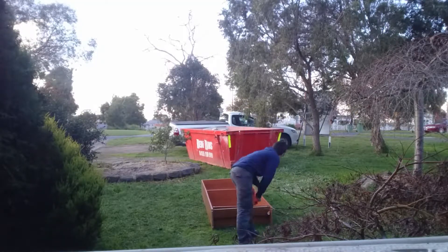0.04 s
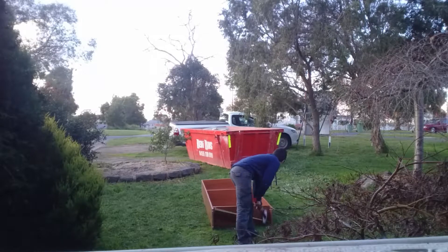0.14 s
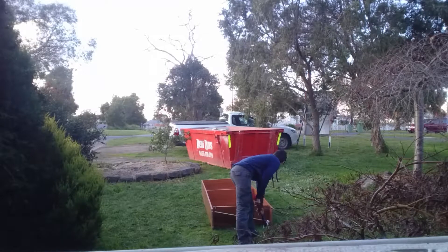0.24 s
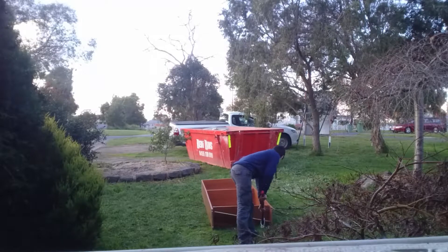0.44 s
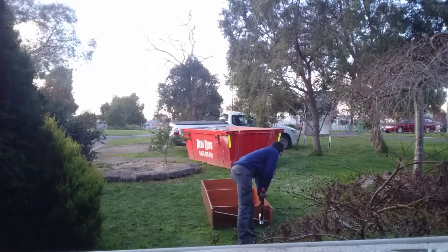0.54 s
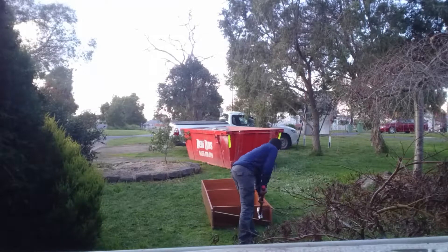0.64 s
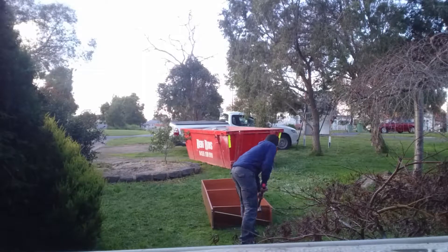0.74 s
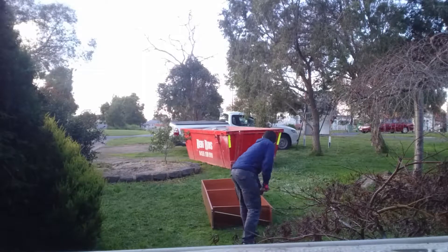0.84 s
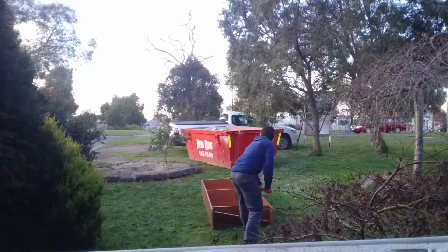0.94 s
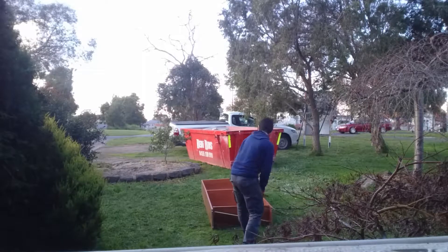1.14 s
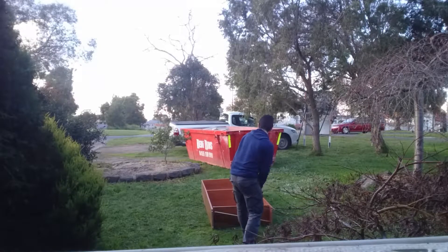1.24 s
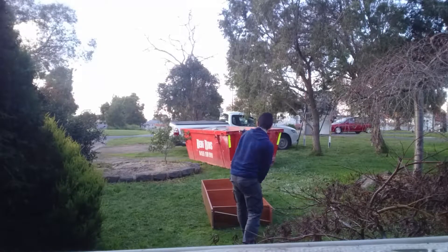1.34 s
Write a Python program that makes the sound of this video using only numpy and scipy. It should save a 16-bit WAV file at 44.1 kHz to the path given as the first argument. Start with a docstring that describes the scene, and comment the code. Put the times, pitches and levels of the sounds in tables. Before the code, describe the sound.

One loud, hollow bang of a wooden bookshelf falling on grass, then faint ticks.

```python
"""On a lawn, a stereo microphone a few metres from a wooden bookshelf. A distant road hums, a far car
passes and a little wind rises. At 0.2 s the toppling shelf lands on one edge; at 0.25 s the whole case
slams down and its boards knock. Each blow cracks and rings the panels, and house and trees scatter it
back. Around 0.5 s loose pieces tick as they settle; then a second far car swells and fades."""
import sys
import numpy as np
from scipy import signal
from scipy.fft import rfft, irfft, next_fast_len
from scipy.io import wavfile

SR = 44100
rng = np.random.default_rng(int(sys.argv[2]) if len(sys.argv) > 2 else 0)


def dump(signal):
    """Clip the signal to [-1, 1] and save it as 16-bit WAV at the path in sys.argv[1]."""
    limited = np.clip(np.atleast_2d(signal).T, -1, 1)
    pcm = np.round(limited * 32767).astype(np.int16)
    wavfile.write(sys.argv[1], SR, pcm)


N = 61739
BANDS_HZ = 25 * 2 ** (np.arange(29) / 3)  # third-octave centres


def undb(db):
    """Decibels to gain."""
    return 10 ** (np.asarray(db) / 20)


def pan(db):
    """Left and right gains for a level difference."""
    return undb(np.array([[db], [-db]]) / 2)


def at(hz, table, col=1):
    """Read a column of a table on a log-frequency axis."""
    table = np.array(table)
    return np.interp(np.log(np.maximum(hz, 1)), np.log(table[:, 0]), table[:, col])


def since(start):
    """Seconds since a moment, zero before it."""
    return np.maximum(np.arange(N) / SR - start, 0)


def ring(t, t60, rise):
    """Envelope that swells and then dies away."""
    return (1 - np.exp(-t / rise)) * np.exp(-np.log(1000) * t / t60)


def noise(spectrum, alike_hz):
    """Stereo noise of unit level; left and right are alike below alike_hz."""
    size = next_fast_len(N)
    f = np.arange(size // 2 + 1) * SR / size
    mid, side = rfft(rng.standard_normal((2, size)))
    alike = 1 / (1 + (f / alike_hz) ** 2)
    stereo = np.sqrt(1 + alike) * mid + np.sqrt(1 - alike) * side * np.array([[1], [-1]])
    y = irfft(spectrum(f) * stereo, size)[:, :N]
    return y / y.std()


def band(hz, alike_hz):
    """A third of an octave of stereo noise."""
    return noise(lambda f: np.exp(-(np.log2((f + 1) / hz) * 4) ** 2), alike_hz)


def hump(hz, width_hz, alike_hz):
    """Noise around one resonance."""
    return noise(lambda f: 1 / (1 + (2 * (f - hz) / width_hz) ** 2), alike_hz)


def add(out, start, sound):
    """Mix a sound in at a moment."""
    i = int(start * SR)
    count = min(sound.shape[-1], N - i)
    out[:, i:i + count] += sound[..., :count]


# spectrum of the distant road (f/Hz, relative level/dB)
ROAD_SPECTRUM = [(41, -48), (70, -16.5), (150, -11), (172, -21.5), (246, -4.5), (301, -19), (386, -14),
                 (578, -13.5), (632, -16), (3640, -27.5), (5100, -37.5), (15000, -47.5)]
# far cars (peak t/s, half-length/s, f/Hz, width/Hz, level/dB)
FAR_CARS = [(0.055, .15, 406.3, 110, -71), (1.035, .17, 630.8, 503.2, -77)]
# slow drift of the whole background (t/s, gain/dB)
BACKGROUND_DRIFT = [(0, 2), (.7, 0.5), (1.1, 0.5), (1.4, -2)]

def background():
    """Far behind the shelf, road noise with a low drone and passing cars; a soft gust to the right."""
    t, alike_hz = since(0), 700
    road = undb(-68) * noise(lambda f: undb(at(f, ROAD_SPECTRUM)), alike_hz)
    gust_db = 10 * np.exp(-((t - 0.35) / 0.25) ** 2)
    wind = undb(-65.5 + gust_db) * hump(hz=39.87, width_hz=21, alike_hz=45) * pan(-4.5)
    drone = undb(-68.5) * hump(hz=247, width_hz=36, alike_hz=alike_hz)
    cars = sum(undb(db) / np.hypot(1, (t - peak) / half_length) * hump(hz, width, alike_hz)
               for peak, half_length, hz, width, db in FAR_CARS)
    drift_db = np.interp(t, *np.array(BACKGROUND_DRIFT).T)
    return (road + wind + drone + cars) * undb(drift_db)


# blows on the boards (t/s, bass/dB, middle/dB, presence/dB, treble/dB, snap/dB, crack/dB,
# contact/ms, pan L-R/dB)
BOARD_BLOWS = [(0.2037, -5.5, -6, -1.5, 0.5, -3, -11, 0.18, -0.5),
               (0.21, -5.5, -7.5, -1, -7, -6.5, -17, .2, 6.5),
               (0.2275, -7.5, -10.5, -13, -0.5, 14.5, -16.5, 0.08, -7),
               (0.247, -5.5, -10.5, -6, -10, 0, -2.5, 0.16, 4.5), (0.2500, -2, -2, 1, 1.5, 1, 7.5, .33, 1),
               (0.2582, -3.5, -1.5, -5.5, -14.5, -2.5, 0.5, 0.14, 4.5),
               (0.2927, -17, -17.5, -10.5, -17.5, 11.5, -9.5, .2, 3.5),
               (0.2954, -17, -24, -13, -9, 17, -16.5, 0.051, 3),
               (0.3250, -1.5, -10, -16, -25, 11.5, -19.5, 0.27, -1)]
# centres of bass, middle, presence and treble (f/Hz)
ZONE_CENTRES = [330, 900, 2800, 7500]

def blows():
    """Each blow sends a pressure crack to the microphone; returns the cracks and the hits on the boards."""
    cracks, hits, t = np.zeros((2, N)), [], since(0)[:N // 8]
    for start, *zone_db, snap_db, crack_db, contact_ms, pan_db in BOARD_BLOWS:
        contact = t / (contact_ms / 1000) - 2
        pulse = -2 * contact * np.exp(-contact ** 2)  # slope of a bell-shaped push
        add(cracks, start, pulse * undb(crack_db - 12) * pan(pan_db))
        band_db = at(BANDS_HZ, list(zip(ZONE_CENTRES, zone_db)))
        hits.append((start, band_db, snap_db, pan_db))
    low_cut = signal.butter(2, 260, "high", fs=SR, output="sos")
    return signal.sosfilt(low_cut, cracks), hits


# dense modes of the boards (f/Hz, band level/dB, t60/s, pan L-R/dB)
BOARD_MODES = [(100, -52.5, 0.14, 2.5), (210.4, -40, .25, 9), (449.2, -37.5, 0.29, 5), (900, -34, 0.13, 5),
               (1730, -25.5, 0.11, 1), (2449, -26.5, 0.24, 4.5), (4200, -28.5, 0.17, 2.5),
               (7230, -36.5, 0.23, -2), (12360, -49, .12, -10), (15500, -73.5, .12, -2.5)]

def boards(hits):
    """Each hit snaps and rings off in the boards, whose modes lie so close that they sound as noise."""
    out, t = np.zeros((2, N)), since(0)[:N // 4]
    offsets = rng.integers(0, N - len(t), 64)  # each hit rings with its own stretch of noise
    snap = np.exp(-t / 0.00093)
    for k, hz in enumerate(BANDS_HZ):
        if hz < BOARD_MODES[0][0] * 2 / 3:
            continue
        modes = band(hz, alike_hz=900) * undb(at(hz, BOARD_MODES)) * pan(at(hz, BOARD_MODES, col=3))
        decay = ring(t, t60=at(hz, BOARD_MODES, col=2), rise=1 / hz)
        for (start, band_db, snap_db, pan_db), i in zip(hits, offsets):
            envelope = decay * (1 + undb(snap_db) * snap) * undb(band_db[k])
            add(out, start, modes[:, i:i + len(t)] * envelope * pan(pan_db))
    return out


# modes of the hollow case (f/Hz, level landing on edge/dB, level landing flat/dB, t60/s)
CASE_MODES = [(133.3, -41, -35.5, 0.26), (180.4, -31.5, -26.5, 0.26), (249.6, -18, -24.5, .25),
              (268.23, -15, -16.5, 0.21), (297.4, -26, -26, .26), (355.3, -25.5, -22, 0.2),
              (390.2, -17.5, -25, .19), (397, -11, -22.5, 0.21), (551, -19.5, -26.5, .22),
              (597, -14, -21.5, 0.11), (643, -24.5, -20.5, 0.095), (819.4, -14.5, -20.5, .15),
              (880, -25, -22, 0.16), (961, -36.5, -15, 0.08), (1072, -18, -30, 0.18),
              (1128, -28, -23, 0.23), (1241, -25, -24, 0.23), (1334, -28.5, -25, 0.24)]
# landings on the lawn, edge then flat (t/s, rise of the ring/s)
CASE_LANDINGS = [(0.2043, 0.016), (0.2504, 0.0041)]

def case_boom():
    """The hollow case booms twice, a little to the left; edge and flat side drive its modes differently."""
    out, right_lag_s = np.zeros((2, N)), 0.00019
    t = np.array([since(0), since(right_lag_s)])[:, :N // 2]
    for hz, *drive_db, t60 in CASE_MODES:
        for (start, rise), db in zip(CASE_LANDINGS, drive_db):
            add(out, start, undb(db) * ring(t, t60, rise) * np.sin(2 * np.pi * hz * t))
    return out * pan(3.5)


# far scatter from hedge and trees (f/Hz, level/dB, t60/s)
TREE_SCATTER = [(100, -10, 0.24), (295, -13, 0.33), (1238.4, -18, 0.39), (2200, -15.5, .44),
                (3300, -14.5, .44), (5200, -25, 0.51), (13000, -30, .22)]
# near reflections from the house front (f/Hz, level/dB)
HOUSE_FRONT = [(120, -5), (300, -13.5), (1000, -19), (4000, -19.5), (9000, -20), (13000, -15)]

def garden_echo(sound):
    """The house front returns a cluster of reflections around 70 ms, hedge and trees a longer tail."""
    response = 0
    cluster = np.exp(-((since(0) - 0.07) / 0.022) ** 2)
    for hz in BANDS_HZ[BANDS_HZ > TREE_SCATTER[0][0] * 2 / 3]:
        tail = ring(since(0.0093), t60=at(hz, TREE_SCATTER, col=2), rise=0.012)
        for envelope, table in (tail, TREE_SCATTER), (cluster, HOUSE_FRONT):
            echo = band(hz, alike_hz=600) * envelope
            echo *= np.sqrt(hz / SR / np.sum(echo ** 2))  # energy in proportion to bandwidth
            response = response + echo * undb(at(hz, table))
    return signal.fftconvolve(sound, response, axes=1)[:, :N]


# loose pieces (t/s, level/dB, centre f/Hz, loss an octave from the centre/dB, snap/dB, pan L-R/dB)
LOOSE_PIECES = [(0.4380, -36, 4167, 23, 20, 0), (0.4724, -32.5, 4200, 4.5, 10.5, 2),
                (0.4790, -34, 5000, -0.5, 12, 6), (0.5082, -28, 14000, 2.2, 9, 2),
                (0.512, -30, 13760, 7, 17, 0.5), (0.5200, -28.5, 290, 7, 12, 9),
                (0.5360, -41.5, 7000, 1, 0, 1)]

def settling_ticks():
    """Loose pieces tick as they settle; returns their light hits on the boards."""
    return [(start, db - abs(loss_db) * np.log2(BANDS_HZ / hz) ** 2, snap_db, pan_db)
            for start, db, hz, loss_db, snap_db, pan_db in LOOSE_PIECES]


def scene():
    """At the microphone: the shelf a few metres off, the garden around it, the road far behind."""
    cracks, hits = blows()
    knocks = cracks + boards(hits + settling_ticks())
    boom = case_boom()
    return boom + knocks + garden_echo(knocks + undb(-3.5) * boom) + background()


def record(dry):
    """The microphone rolls off the top octave and the recorder cuts steeply above 15.5 kHz."""
    microphone = signal.butter(4, 13800, fs=SR, output="sos")
    recorder = signal.ellip(8, 0.2, 70, 15500, fs=SR, output="sos")
    return signal.sosfilt(recorder, signal.sosfilt(microphone, dry))


dry = scene()
out = record(dry)
dump(out)
```